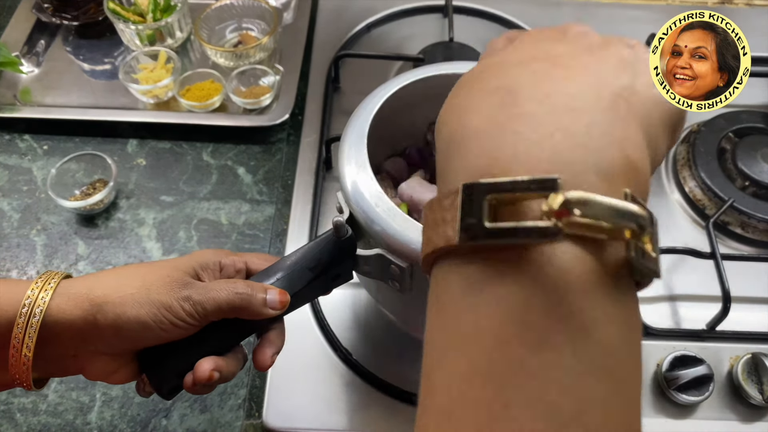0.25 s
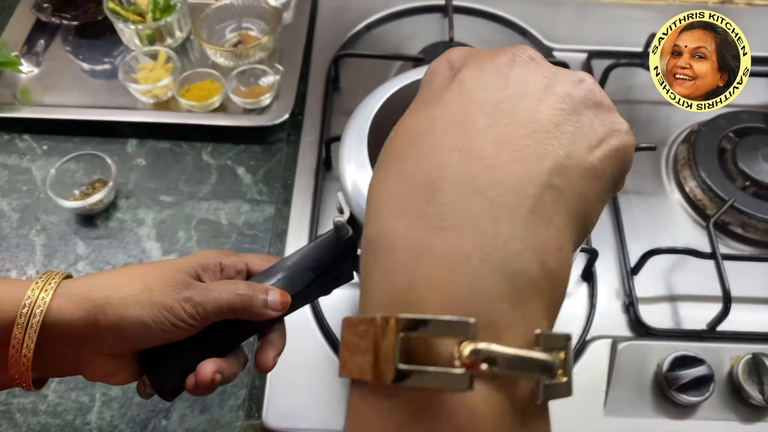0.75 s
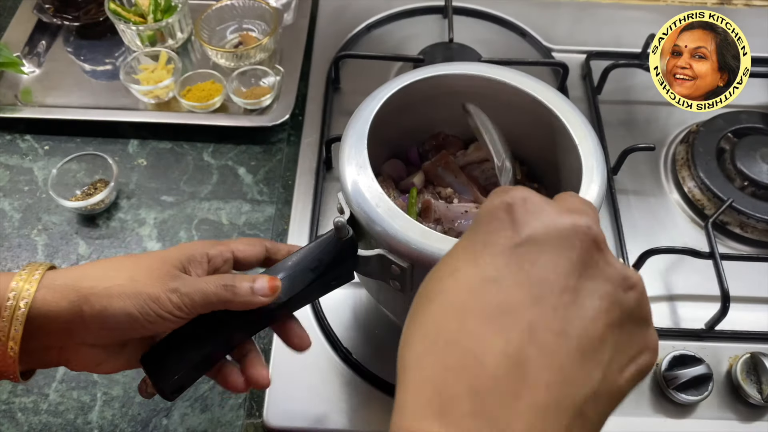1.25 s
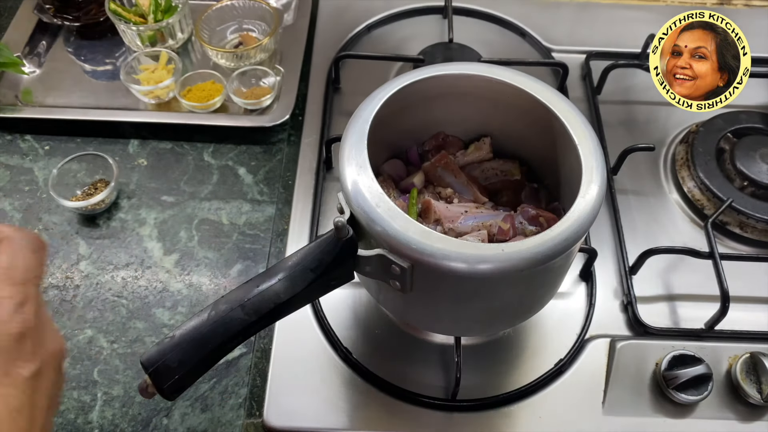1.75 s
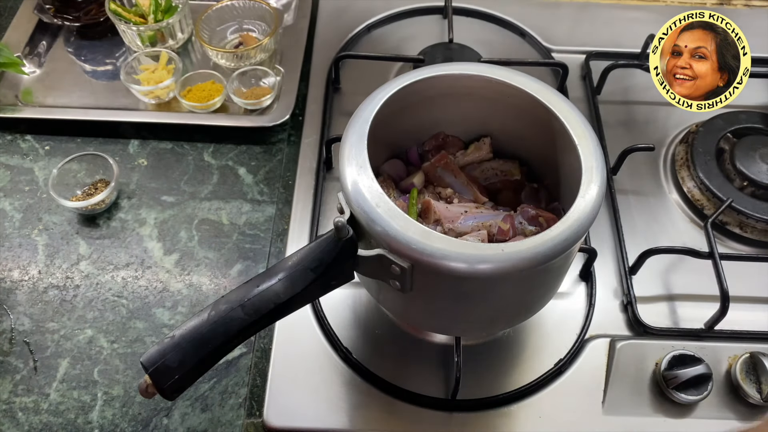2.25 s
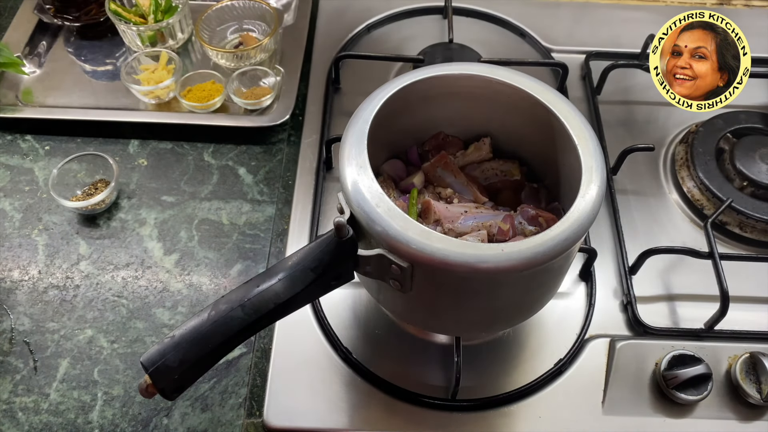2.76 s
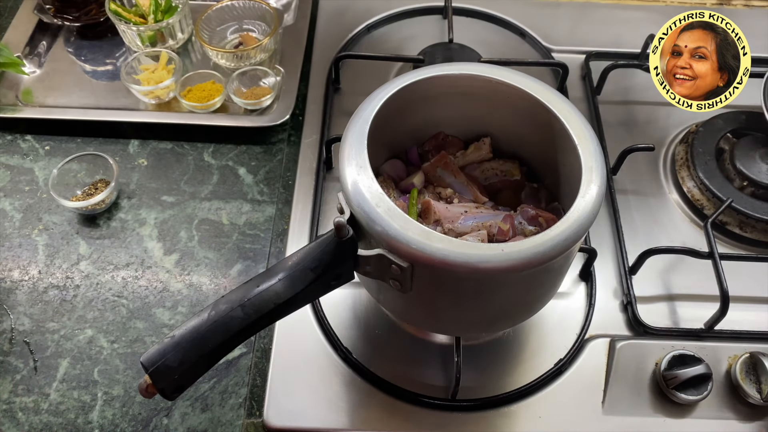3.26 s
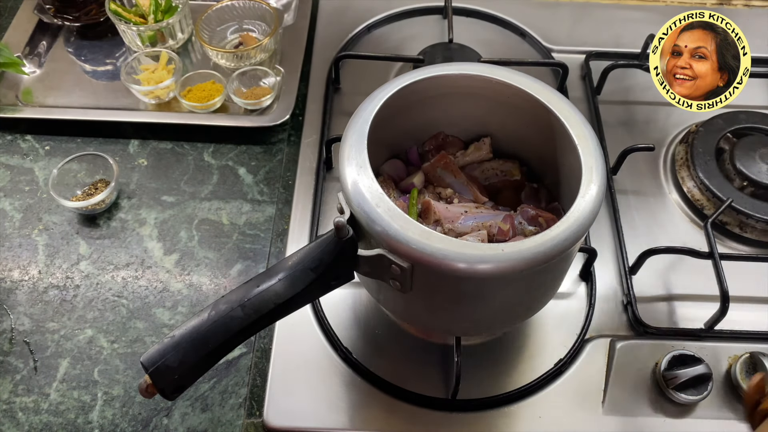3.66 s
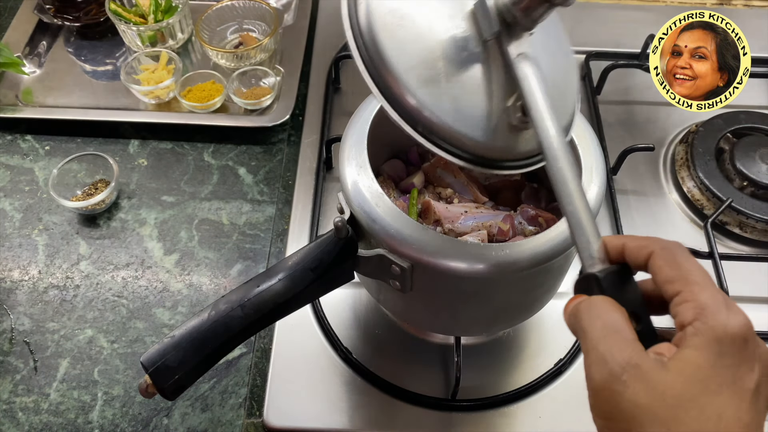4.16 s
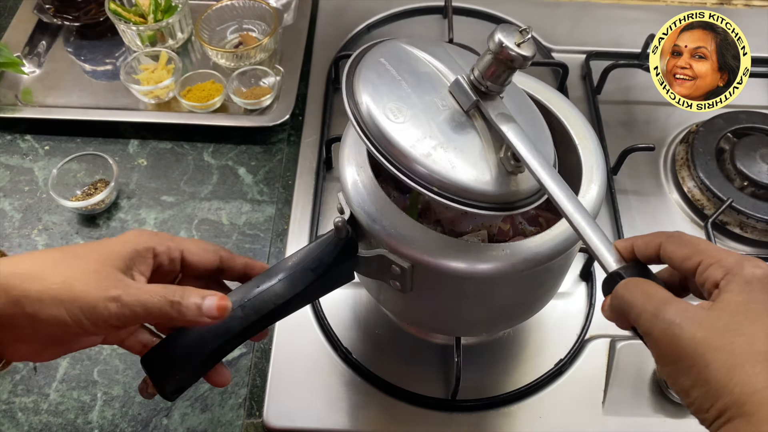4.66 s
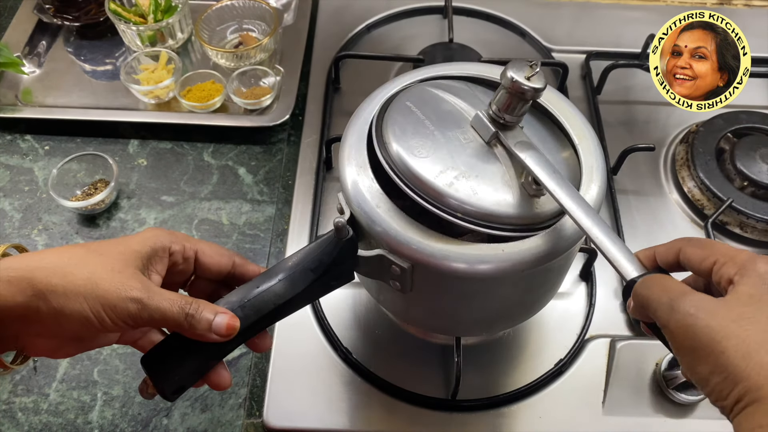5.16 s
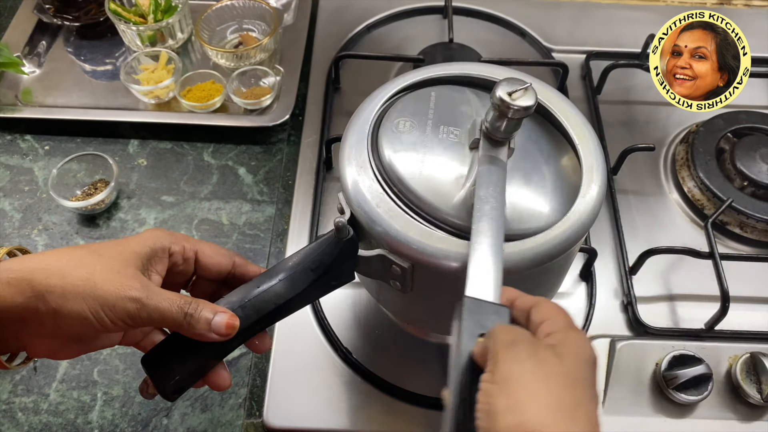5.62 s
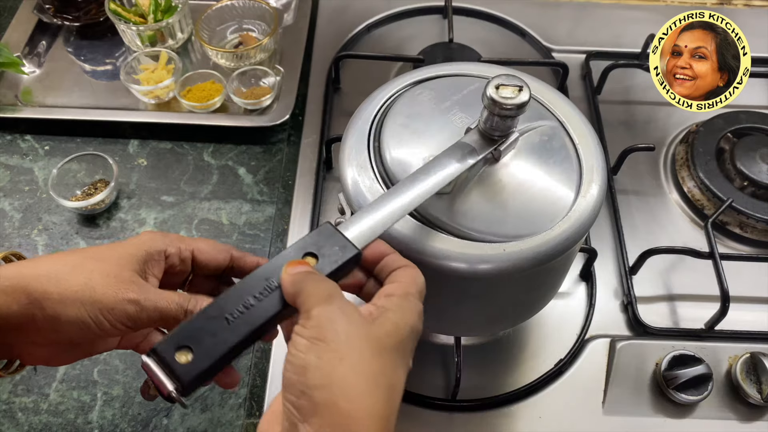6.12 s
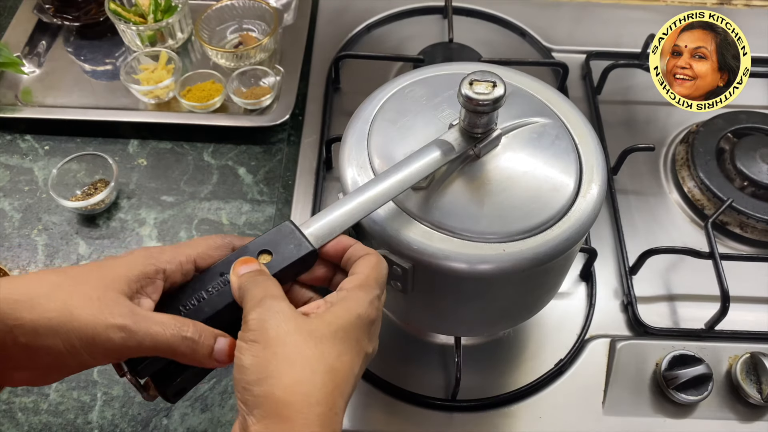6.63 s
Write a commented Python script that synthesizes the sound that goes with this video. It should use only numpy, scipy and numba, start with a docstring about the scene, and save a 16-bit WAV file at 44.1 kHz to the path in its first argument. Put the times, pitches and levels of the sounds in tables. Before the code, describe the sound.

A ringing tap on a metal pot is followed by brief, light stirring, heard close up in a home kitchen with a faint motor hum. After a short lull and a delicate jingle of bangles, cookware and a loose lid knock and ring at the counter. Then the lid scrapes and clanks against the pressure cooker's rim, booming hollowly as it closes, and settles with small clicks.

```python
"""A pressure cooker being closed in a small hard kitchen. A ladle taps and stirs the pot, bangles tinkle,
the lid and other cookware clatter at the counter, then the lid is slid into the pot and swung shut.
Knocks and rubbing are micro-impacts that ring the modes of each metal body. Jolts of the lid pump the
air in the pot, which booms lower as the gap closes. Behind: room noise, motor hums, a faint far whine."""
import sys
import numpy as np
from scipy import signal
from scipy.fft import rfft, irfft
from scipy.io import wavfile
from scipy.ndimage import uniform_filter1d
from numba import njit

SR = 44100
rng = np.random.default_rng(int(sys.argv[2]) if len(sys.argv) > 2 else 0)


def wav_out(sig):
    """Save sig, one row per channel (or a flat mono array), as 16-bit PCM at SR to the path in sys.argv[1]."""
    wavfile.write(sys.argv[1], SR, np.round(np.clip(np.atleast_2d(sig).T, -1, 1) * 32767).astype(np.int16))


N = 303842


def from_db(db):
    """Decibels to gain."""
    return 10 ** (np.asarray(db) / 20)


def rms_one(x):
    """Scale to rms 1."""
    return x / np.sqrt(np.mean(x ** 2) + 1e-20)


def at_hz(points, hz):
    """Interpolate (frequency [Hz], value) rows on a log-frequency axis."""
    point_hz, values = np.transpose(points)
    return np.interp(np.log(hz + 1), np.log(point_hz), values)


def drift(rate_hz, size):
    """Straight lines between unit Gaussian knots."""
    knots = rng.standard_normal(int(size * rate_hz / SR) + 3)
    return np.interp(np.arange(size) * rate_hz / SR, np.arange(len(knots)), knots)


def swells(times_s, held_s, db, rise_db_per_s, fall_db_per_s):
    """One gain curve per gesture: rise, hold from its time, fall; silent 60 dB down."""
    t = np.arange(N) / SR - np.array(times_s)[:, None]
    past_hold_s = np.maximum(t - np.array(held_s)[:, None], 0)
    down_db = rise_db_per_s * np.maximum(-t, 0) + fall_db_per_s * past_hold_s
    return from_db(np.array(db)[:, None] - down_db) * (down_db < 60)


def colour(x, spectrum):
    """Minimum-phase filter of unit power gain: nothing sounds before its cause."""
    log_gain = np.log(from_db(at_hz(spectrum, np.linspace(0, SR / 2, 2049))))
    cepstrum = irfft(log_gain)
    cepstrum[1:2048] *= 2
    cepstrum[2049:] = 0
    taps = irfft(np.exp(rfft(cepstrum)))
    return signal.oaconvolve(x, taps / np.linalg.norm(taps))[:x.shape[-1]]


def resonance(x, hz, width_hz):
    """Two-pole resonance, peak gain 1."""
    r = np.exp(-np.pi * width_hz / SR)
    gain = (1 - r * r) / 2
    return signal.lfilter([gain, 0, -gain], [1, -2 * r * np.cos(2 * np.pi * hz / SR), r * r], x)


@njit
def gliding_resonance(x, hz, width_hz):
    """Two-pole resonance with one centre frequency per sample."""
    r = np.exp(-np.pi * width_hz / SR)
    feedback = 2 * r * np.cos(2 * np.pi * hz / SR)
    y = np.zeros(len(x))
    for i in range(2, len(x)):
        y[i] = (1 - r) * (x[i] - x[i - 2]) + feedback[i] * y[i - 1] - r * r * y[i - 2]
    return y


def crossover(x, hz):
    """Split into in-phase low and high bands."""
    filters = [signal.butter(2, hz, kind, fs=SR, output="sos") for kind in ("low", "high")]
    return [signal.sosfilt(np.tile(sos, (2, 1)), x) for sos in filters]


def contact(knocks, rubs, knock_db, lows_db, highs_db, rub_db, grains_per_s, rattle_s, spot_cycles):
    """Micro-impact force, sustained in rubs, a dying burst per knock; also each struck spot's ring."""
    envelopes = np.zeros((3, N))   # bass, mids, treble
    spots = np.zeros((2, N))
    if rubs:
        rub_s, held_s, db, bass_db, treble_db = np.transpose(rubs)
        scrapes = swells(rub_s, held_s, rub_db + db, rise_db_per_s=712.5, fall_db_per_s=213)
        hiss = swells(rub_s, held_s, rub_db + db + treble_db, rise_db_per_s=712.5, fall_db_per_s=250.5)
        envelopes += [from_db(bass_db) @ scrapes, scrapes.sum(axis=0), hiss.sum(axis=0)]
        envelopes *= from_db(2 * drift(90, N) - 0.8)   # uneven rubbing
    t = np.arange(SR // 10) / SR
    burst = np.exp(-t / rattle_s) * (1 - np.exp(-t / 0.001))
    for s, db, hz, spot_db in knocks:
        span = slice(round(s * SR), round(s * SR) + len(t))
        # a knock takes the colour of the nearest rub
        *_, bass_db, treble_db = min(rubs, key=lambda row: abs(row[0] - s)) if rubs else (0, 0)
        bands_db = np.array([[lows_db + bass_db], [0], [highs_db + treble_db]])
        envelopes[:, span] += from_db(knock_db + db + bands_db) * burst
        side_phase = rng.normal(0, 0.65) * np.array([[1], [-1]])
        fade = np.exp(-t * hz / spot_cycles) * (1 - np.exp(-t / 0.00033))
        ring = np.sin(2 * np.pi * hz * t + side_phase) * fade
        chatter_db = 3.5 * drift(300, len(t))
        spots[:, span] += from_db(db + spot_db + chatter_db) * ring
    sizes = from_db(2.98 * np.minimum(rng.exponential(1, N), 4)) * rng.choice([-1, 1], N)
    grains = rms_one(sizes * (rng.random(N) < grains_per_s / SR))
    grains[[round((s + 0.001) * SR) for s, *_ in knocks]] = 6.1   # first impact of each knock
    lows, rest = crossover(grains, hz=1500)
    mids, highs = crossover(rest, hz=6000)
    return np.sum(envelopes * [lows, mids, highs], axis=0), spots


def dense_modes(force, t60_s):
    """Countless weak modes: seven dying noise responses, fading in and out as the grip shifts."""
    t = np.arange(SR // 25) / SR
    out = 0
    for _ in range(7):
        response = rng.standard_normal(len(t)) + 1.7 * rng.standard_normal((2, len(t)))
        response *= from_db(-60 * t / t60_s)
        response[:, 0] = 0.093 * np.linalg.norm(response[0])   # direct crack
        response /= np.linalg.norm(response[0])
        drive = force * from_db(5.6 * drift(7.06, len(force)) - 11.5)
        out = out + signal.oaconvolve([drive], response, axes=1)[:, :len(force)]
    return out


def body(touch, modes, clatter, ring_db, left_db, clatter_t60_s):
    """Clear modes over dense clatter; a blow near a mode's pitch drives it most."""
    force, spots = touch
    busy = np.flatnonzero(force)
    span = slice(busy[0], min(N, busy[-1] + SR // 4))
    force = force[span] + 1e-18
    out = spots.copy()
    out[:, span] += dense_modes(colour(force, clatter), clatter_t60_s)
    for hz, width_hz, db in modes:
        drive = force * from_db(3.5 * drift(10.44, len(force)))   # the contact point wanders
        ring = resonance(drive + 0.039 * spots[0, span], hz, width_hz)
        side_db = rng.normal(0, 2.2) * np.array([[1], [-1]])
        out[:, span] += from_db(ring_db + db + side_db) * [ring, np.roll(ring, rng.integers(-4, 5))]
    return out * from_db([[left_db / 2], [-left_db / 2]])


def ladle_taps():
    """The ladle knocks on the rim and the pot rings."""
    # blows: (time [s], level [dB], spot pitch [Hz], spot ring re level [dB])
    knocks = [(0.0055, 1, 3404, -5.5), (0.029, -22.5, 3300, -2), (0.045, -30, 3480, 2),
              (0.0676, -17, 3260, 3)]
    # scrapes: (time [s], hold [s], level [dB], bass re mids [dB], treble re mids [dB])
    rubs = [(0, 0.0058, -8.5, 4.5, -1), (.1, 0.018, -23, -2.5, -5)]
    # pot modes: (frequency [Hz], width [Hz], level [dB])
    modes = [(1208, 10, -12), (3290, 8.9, -5.5), (3120, 27, -16), (4620, 12, -11), (4800, 25.1, -11.5),
             (5080, 58, -20), (2246, 18, -22.5), (2635, 20, -23), (3365, 43, -9.5), (6800, 20, -25.5),
             (9110, 30, -26)]
    # dense-mode spectrum: (frequency [Hz], level [dB])
    clatter = [(180, -64), (500, -38.5), (1190, -28), (2460, -19.5), (3320, -12), (3790, -25), (11500, -27),
               (15800, -36.5)]
    touch = contact(knocks, rubs, knock_db=-4, lows_db=-26, highs_db=6.5, rub_db=-9.5,
                    grains_per_s=4600, rattle_s=0.00169, spot_cycles=18)
    return body(touch, modes, clatter, ring_db=29.5, left_db=0.5, clatter_t60_s=0.0038)


def room_tone():
    """Steady house and street noise, alike on both sides in the bass."""
    # noise spectrum: (frequency [Hz], level [dB])
    spectrum = [(15, -53.5), (28, -46), (60, -10.5), (100, -6.5), (160, -11.5), (316, -10.5), (600, -13),
                (2030, -20.5), (3390, -22.5), (5000, -30.5), (7500, -48.5), (9000, -43.5), (10800, -40),
                (12500, -52.5), (15800, -61)]
    # left-right likeness: (frequency [Hz], correlation [ratio])
    likeness = [(60, 0.99), (250, 0.98), (550, 0.17), (1650, 0.12), (4970, 0.078), (15000, 0.29)]
    hz = np.fft.rfftfreq(N, 1 / SR)
    mid, side = rfft(rng.standard_normal((2, N))) * from_db(at_hz(spectrum, hz))
    alike = at_hz(likeness, hz)
    noise = irfft(np.sqrt(1 + alike) * mid + np.sqrt(1 - alike) * side * [[1], [-1]], N)
    return from_db(-45.5 + drift(4.7, N)) * rms_one(noise)


def motor_hums():
    """Narrow wavering noise bands from motors in the house."""
    # hums: (frequency [Hz], width [Hz], level [dB])
    bands = [(111, 25, -58.5), (209.7, 9.6, -54.5), (313, 12, -59), (11600, 150, -100.5)]
    return sum(from_db(db) * rms_one(resonance(rng.standard_normal(N), hz, width_hz))
               for hz, width_hz, db in bands)


def ladle_stirring():
    """The ladle scrapes and bumps the pot as it stirs."""
    # blows: (time [s], level [dB], spot pitch [Hz], spot ring re level [dB])
    knocks = [(0.5077, -35, 1176, 3.5), (0.5657, -35, 2470, 11), (0.5864, -21, 2670, -2),
              (0.596, -10.5, 900, -19.5), (0.607, -24, 3900, -5), (0.6385, -13, 1275, -4),
              (0.647, -25.5, 1293, 1), (0.918, -30, 1880, -2), (0.945, -32.5, 840, 0.5),
              (0.951, -23, 2500, -7), (0.9702, -34, 1866, 8), (1.0012, -23.5, 2510, -14),
              (1.1345, -45.5, 2690, 13.5)]
    # scrapes: (time [s], hold [s], level [dB], bass re mids [dB], treble re mids [dB])
    rubs = [(0.494, 0.03, -36, -1, 13.5), (.6, .003, -40.5, 1, 10.5), (.64, 0.004, -44.5, 9, -25),
            (0.925, 0.016, -32, -3.5, 1), (0.955, 0.015, -30, -2, 0.5), (1.01, 0.0089, -44.5, 2, 14)]
    # ladle and pot modes: (frequency [Hz], width [Hz], level [dB])
    modes = [(890, 58, -22), (1324, 55, -10), (1895, 83, -11.5), (2550, 130, -6.5), (3300, 63, -12),
             (3810, 120, -11.5)]
    # dense-mode spectrum: (frequency [Hz], level [dB])
    clatter = [(290, -41), (500, -15), (1090, -9), (1280, -4), (1610, -11.5), (2560, -0.5), (4000, -19),
               (5500, -28), (9000, -27.5), (15800, -34.5)]
    touch = contact(knocks, rubs, knock_db=-7.5, lows_db=-4, highs_db=-3, rub_db=-3,
                    grains_per_s=3400, rattle_s=0.0047, spot_cycles=17)
    return body(touch, modes, clatter, ring_db=15, left_db=-1.5, clatter_t60_s=0.018)


def far_whine():
    """A few faint, close, wavering tones that hold, then fade."""
    # tones: (frequency [Hz], level [dB])
    lines = [(3165, -58), (3305, -66), (3402, -56), (3480, -64)]
    tones = 0
    for hz, db in lines:
        gain = from_db(db + 5.6 * drift(5.3, N))
        tones = tones + gain * rms_one(resonance(rng.standard_normal(N), hz, width_hz=5.1))
    return tones * swells(times_s=[1.12], held_s=[0.66], db=[0], rise_db_per_s=500, fall_db_per_s=53)[0]


def bangles():
    """Bangles clink and ring in high, narrow modes."""
    # clinks: (time [s], level [dB], spot pitch [Hz])
    clinks = [(1.5085, -66, 10570), (1.759, -71, 15300), (1.8765, -55.5, 10500), (2.029, -64, 14500),
              (2.1092, -49, 11050), (2.362, -43, 10410), (2.385, -51, 14920)]
    # bangle modes: (frequency [Hz], width [Hz], level [dB])
    modes = [(9340, 25, -17), (10600, 9.7, -1), (11050, 10, -8), (11600, 20, -20.5), (12700, 12, -11),
             (13870, 25, -13), (14490, 16, -10), (14920, 12, -0.5)]
    # dense-mode spectrum: (frequency [Hz], level [dB])
    clatter = [(5000, -104), (9000, -19), (15000, 2)]
    knocks = [(s, db, hz, -3) for s, db, hz in clinks]   # spot ring 3 dB down
    touch = contact(knocks, [], knock_db=-6, lows_db=14, highs_db=11.5, rub_db=0,
                    grains_per_s=1800, rattle_s=0.0075, spot_cycles=200)
    return body(touch, modes, clatter, ring_db=34.5, left_db=-1.5, clatter_t60_s=0.033)


def counter_thuds():
    """Dull pushes through the counter: short bursts of low noise."""
    # thuds: (time [s], level [dB], upper band edge [Hz])
    pushes = [(1.951, -42, 131), (3.044, -29, 480), (3.148, -25, 476), (5.9, -28, 252), (6.188, -31.5, 250),
              (6.37, -36, 247)]
    out = np.zeros(N)
    t = np.arange(SR // 5) / SR
    for s, db, top_hz in pushes:
        band = signal.butter(3, [120, top_hz], "band", fs=SR, output="sos")
        dull = rms_one(signal.sosfilt(band, rng.standard_normal(len(t))))
        out[round(s * SR):][:len(t)] += from_db(db) * dull * np.exp(-t / 0.04)
    return out


def lid_on_counter():
    """The loose lid knocks, scrapes and rings as it is fetched from the counter."""
    # blows: (time [s], level [dB], spot pitch [Hz], spot ring re level [dB])
    knocks = [(2.2594, -53.5, 676, 16.5), (2.505, -41, 5900, 18), (2.52, -24, 629, -8.5),
              (2.535, -25.5, 1310, 1), (2.542, -31, 4470, 10), (2.55, -24.5, 787, 3.5),
              (2.57, -28, 1826, 3.5), (3.5855, -27, 4300, -3.5), (3.6027, -22, 4350, -1.5),
              (3.612, -32.5, 583, -3), (3.7514, -30.5, 5430, -1.5), (3.8047, -22, 4000, -4),
              (3.8536, -13, 4500, -10.5), (3.86, -23.5, 590, -3), (4.0457, -21.5, 5740, -8.5),
              (4.0785, -9.5, 807, -14.5), (4.098, -11.5, 9900, 0.5), (4.107, -12, 4430, 4.5),
              (4.16, -25.5, 816, -3)]
    # scrapes: (time [s], hold [s], level [dB], bass re mids [dB], treble re mids [dB])
    rubs = [(2.535, 0.013, -20.5, 3, 7), (3.601, 0.014, -23, 4.5, 7), (3.815, 0.015, -29.5, -15, 3),
            (3.86, 0.033, -23, 1.5, 4), (3.93, 0.0073, -39.5, -8.5, -7.5), (4.04, 0.024, -31.5, -7.5, 8.5),
            (4.093, 0.021, -14.5, -6, 11), (4.158, 0.046, -37.5, -6, 12.5)]
    # loose-lid modes: (frequency [Hz], width [Hz], level [dB])
    modes = [(608, 45, -12), (800, 44, -12.5), (1060, 180, -13.5), (2520, 98, -8.5), (3050, 82, -7.5),
             (3320, 9, -4), (3710, 54, -10.5), (5315, 14, -4), (4476, 11, 11.5), (5787, 11, 7.5),
             (5840, 16, 4), (6610, 14, -8), (7190, 10, -6.5), (8450, 12, -2), (8720, 14, -1.5),
             (9300, 14, -3), (9880, 25, -7.5), (10130, 14, -6.5), (10800, 18, -5), (11140, 60, -9.5)]
    # dense-mode spectrum: (frequency [Hz], level [dB])
    clatter = [(100, -59.5), (180, -38.5), (300, -13), (990, 5), (1630, -3.5), (2800, 0), (4400, 0.5),
               (5930, -4), (7600, -17.5), (10200, -4), (12500, -17), (13400, -41.5), (15800, -11)]
    touch = contact(knocks, rubs, knock_db=-5, lows_db=1.5, highs_db=2, rub_db=-3.5,
                    grains_per_s=3000, rattle_s=0.0048, spot_cycles=14.4)
    return body(touch, modes, clatter, ring_db=9.5, left_db=-0.3, clatter_t60_s=0.037)


def cookware():
    """Other cookware knocks and scrapes as it is shifted aside."""
    # blows: (time [s], level [dB], spot pitch [Hz], spot ring re level [dB])
    knocks = [(2.77, -38, 5780, -14), (2.9045, -49, 5870, 18), (2.939, -31.5, 5800, 15.5),
              (2.976, -20, 2700, 1), (3.027, -19, 2820, -4), (3.068, -16, 5170, 7.5),
              (3.1198, -24, 5260, 6), (3.1415, -8, 1097, -11.5), (3.144, -16, 5270, 3),
              (3.3007, -13, 3770, -11), (3.32, -18.5, 3030, -4), (3.3488, -18, 953, -8.5),
              (3.399, -28.5, 2890, 4), (3.419, -9, 2650, -8.5), (3.438, -18, 3740, 3)]
    # scrapes: (time [s], hold [s], level [dB], bass re mids [dB], treble re mids [dB])
    rubs = [(2.78, 0.11, -56.5, 9.5, 14), (2.91, 0.041, -39.5, -3, 10), (2.98, 0.054, -23, 9, 0),
            (3.07, 0.019, -28, -25.5, 3), (3.15, 0.011, -27, 9, -14.5), (3.3, 0.046, -33, 0, -3),
            (3.424, 0.0089, -27, 2.5, -6)]
    # cookware modes: (frequency [Hz], width [Hz], level [dB])
    modes = [(954, 90, -9.5), (1870, 89, -15), (2700, 80, -4), (2990, 140, 1.5), (3720, 56, -1),
             (5040, 60, -3), (5260, 50, -8), (5840, 16, 4.5), (8800, 120, -12), (10400, 49, -11.5),
             (11100, 71, -12)]
    # dense-mode spectrum: (frequency [Hz], level [dB])
    clatter = [(180, -44), (330, -12), (1000, -1), (2000, -12), (3100, 1), (5300, -1), (7600, -15.5),
               (10200, -2), (13400, -32), (15800, -13)]
    touch = contact(knocks, rubs, knock_db=-7.5, lows_db=0.5, highs_db=2.5, rub_db=-2.5,
                    grains_per_s=2500, rattle_s=0.0047, spot_cycles=14.6)
    return body(touch, modes, clatter, ring_db=10.5, left_db=-1, clatter_t60_s=0.033)


def lid_on_rim():
    """The lid slides into the pot and swings shut, rubbing and knocking on the rim."""
    # blows: (time [s], level [dB], spot pitch [Hz], spot ring re level [dB])
    knocks = [(4.66, -25, 3630, 0), (4.676, -27, 1163, -1.5), (4.69, -32, 514.4, 2),
              (4.757, -40.5, 526, 9.5), (4.9951, -27, 1183, 0), (5.0134, -24.5, 2640, 5.5),
              (5.0303, -12, 2580, -6.5), (5.0458, -23, 2610, 2), (5.0847, -16, 2560, -4),
              (5.108, -27.5, 2600, 11), (5.1201, -25, 2500, 4), (5.163, -17, 4630, -6),
              (5.1857, -19.5, 3260, 7), (5.2125, 6.5, 2200, -13.5), (5.2205, -6, 2310, -5),
              (5.2344, 0.5, 2083, -7.5), (5.3605, -21, 3900, -9), (5.3742, -15, 1306, -12),
              (5.6379, -18, 1346, -15.5), (5.7043, -23.5, 1210, 5), (5.7394, -18, 811, -5),
              (5.7581, -22.5, 1203, 5), (5.769, -12, 5420, -13), (5.7936, 4.5, 3946, -9),
              (5.8616, 0.5, 1212, -11), (5.882, 1, 1124, -24), (5.9, -20, 1184, -2),
              (5.917, -8, 10600, -19), (5.9477, 1.5, 1175, -32), (6.049, -10, 2480, -20),
              (6.1721, -10.5, 3730, -8), (6.1902, -26, 1113, -6), (6.3644, -17, 852, -20),
              (6.4396, -28.5, 1240, -2), (6.4712, -32.5, 1203, 5), (6.51, -33, 1217, 8),
              (6.525, -21.5, 1694, -7.5), (6.5475, -18, 3780, -6.5), (6.5745, -32.5, 3806, 9),
              (6.648, -26, 3070, -4.5)]
    # scrapes: (time [s], hold [s], level [dB], bass re mids [dB], treble re mids [dB])
    rubs = [(4.673, 0.017, -35, 6.5, 2.5), (4.997, 0.13, -35.5, 8, -14), (5.185, 0.061, -18.5, -1.5, -4),
            (5.367, 0.014, -30, 4.5, -9), (5.53, 0.15, -50.5, 6, -3), (5.65, 0.071, -39, 3, -11),
            (5.74, 0.04, -31, 0, -15), (5.802, 0.011, -17.5, -0.5, 0.5), (5.865, 0.03, -22.5, 1, -5.5),
            (5.93, 0.036, -19, 1, 4.5), (6.07, 0.13, -37, 0.5, -23), (6.155, 0.013, -35.5, 0, 1),
            (6.177, 0.015, -26.5, -2.5, -5), (6.368, 0.0044, -41, 13, -7.5), (6.44, 0.1, -46, 13.5, -13),
            (6.549, 0.0078, -42, -3, -2), (6.657, 0.0035, -47, -1, 11.5)]
    # seated-lid modes: (frequency [Hz], width [Hz], level [dB])
    modes = [(1062, 15, -5.5), (1193, 22, 0.5), (2070, 15.4, -13), (2250, 31, -14), (2407, 24, -2),
             (2615, 123, -3.5), (3226, 42, -6.5), (3914, 35, -3.5), (4590, 77, -7.5), (5410, 57, -4.5),
             (5810, 55, -9), (6420, 110, -13.5), (8550, 150, -14.5), (10360, 120, -16.5)]
    # dense-mode spectrum: (frequency [Hz], level [dB])
    clatter = [(100, -64), (290, -27), (500, 5.5), (667, -13.5), (1190, 1.5), (1780, -6), (2060, -5.5),
               (2910, -1), (3890, 0.5), (5600, -6.5), (7400, -19.5), (8500, -9), (10700, -9.5),
               (12600, -24.5), (15800, -43.5)]
    touch = contact(knocks, rubs, knock_db=-13, lows_db=-7, highs_db=6.5, rub_db=-0.3,
                    grains_per_s=2400, rattle_s=0.0061, spot_cycles=20)
    return body(touch, modes, clatter, ring_db=16, left_db=-1, clatter_t60_s=0.023)


def cavity_boom():
    """Jolts of the lid pump the air in the pot; the gap at the rim narrows and the boom sinks."""
    # air resonance: (time [s], pitch [Hz])
    pitch = [(5.0, 436), (5.3, 438), (5.37, 383), (5.5, 396), (5.82, 425), (5.9, 335), (5.95, 324),
             (6.3, 300.6), (6.38, 261.7)]
    # lid jolts: (time [s], hold [s], level [dB])
    jolts = [(5.0, .005, -51), (5.04, 0.012, -43), (5.111, 0.0077, -35), (5.144, 0.0043, -55),
             (5.186, 0.013, -23.5), (5.234, 0.017, -14), (5.295, 0.0053, -31), (5.36, 0.04, -28.5),
             (5.501, 0.0029, -29.5), (5.58, 0.021, -31), (5.7, 0.034, -42.5), (5.796, 0.035, -16.5),
             (5.888, 0.048, -17), (5.996, 0.0091, -17.5), (6.075, 0.011, -27.5), (6.184, 0.02, -16.5),
             (6.279, 0.017, -28), (6.361, 0.041, -23), (6.49, 0.022, -41)]
    hz = np.interp(np.arange(N) / SR, *np.transpose(pitch))
    boom = rng.standard_normal(N) * from_db(1.9 * drift(60, N))
    for width_hz in (21, 150):   # the wider stage darkens the skirts
        boom = gliding_resonance(boom, hz, width_hz)
    boom /= np.sqrt(uniform_filter1d(boom ** 2, size=900) + 1e-20)   # even out the level
    return boom * swells(*np.transpose(jolts), rise_db_per_s=494, fall_db_per_s=431).sum(axis=0)


def kitchen(x):
    """Diffuse wall reflections: a noise tail per side, dying octave by octave."""
    # reverberation: (frequency [Hz], T60 [s])
    t60 = [(300, 0.15), (3000, 0.24), (12000, 0.11)]
    t = np.arange(SR // 2) / SR
    white = rng.standard_normal((2, len(t)))
    tail = 0
    for low_hz in 150 * 2.0 ** np.arange(7):
        octave = signal.butter(2, [low_hz, 2 * low_hz], "band", fs=SR, output="sos")
        tail = tail + signal.sosfilt(octave, white) * from_db(-60 * t / at_hz(t60, 1.5 * low_hz))
    tail *= t > 0.004   # first wall
    return signal.oaconvolve(x, tail / np.linalg.norm(tail[0]), axes=1)[:, :N]


def gain_control(x, threshold_db=-22.5, cut_share=0.11, recovery_db_per_s=2.5):
    """Loud sounds turn the gain down a little; it creeps back."""
    level_db = 10 * np.log10(uniform_filter1d(np.mean(x ** 2, axis=0), size=441) + 1e-12)
    excess_db = np.maximum(level_db - threshold_db, 0)
    ramp_db = recovery_db_per_s * np.arange(N) / SR
    cut_db = np.maximum.accumulate(cut_share * excess_db + ramp_db) - ramp_db
    return x * from_db(-uniform_filter1d(cut_db, size=441))


def scene():
    """Stereo metal; centred boom, thuds, whine and hums; their reflections; room tone."""
    metal = ladle_taps() + ladle_stirring() + bangles() + lid_on_counter() + cookware() + lid_on_rim()
    metal *= from_db(3.5)
    centred = from_db(2) * (cavity_boom() + counter_thuds()) + far_whine() + motor_hums()
    reflections = from_db(-11) * kitchen(metal + 0.36 * centred)
    return metal + centred + reflections + room_tone()


def record(dry, right_lag_s=3e-5, cutoff_hz=15700):
    """Delay the right side, duck the gain, clip the peaks, cut the top."""
    hz = np.fft.rfftfreq(N, 1 / SR)
    right = irfft(rfft(dry[1]) * np.exp(-2j * np.pi * hz * right_lag_s), N)
    ducked = gain_control(np.array([dry[0], right]))
    lowpass = signal.ellip(10, 0.5, 70, cutoff_hz, fs=SR, output="sos")
    return signal.sosfilt(lowpass, np.clip(ducked, -1, 1))


dry = scene()
out = record(dry)
wav_out(out)
```